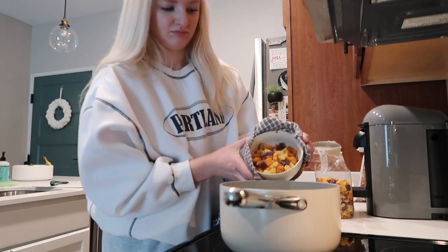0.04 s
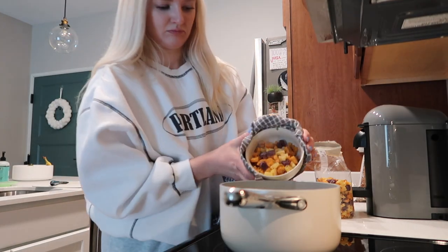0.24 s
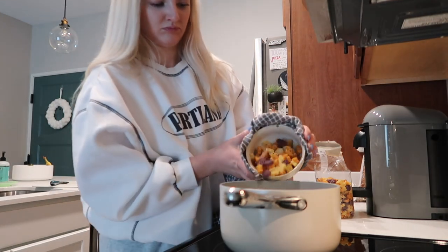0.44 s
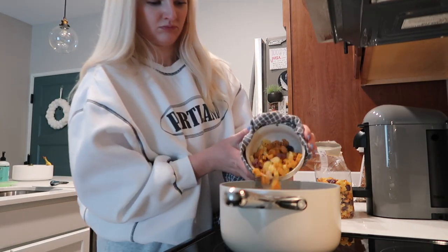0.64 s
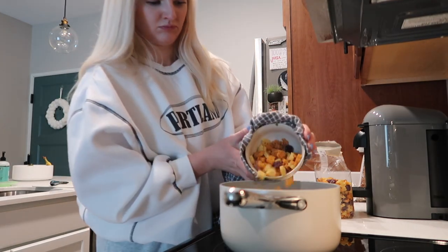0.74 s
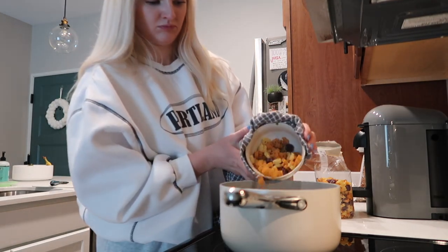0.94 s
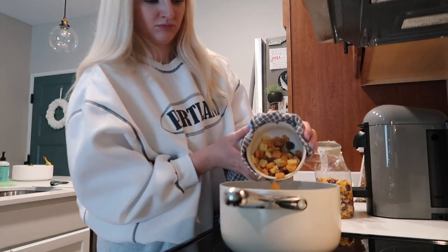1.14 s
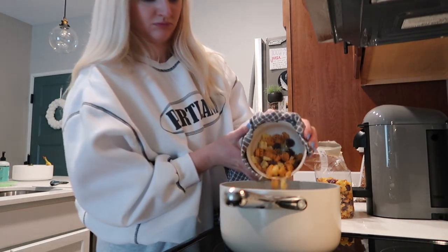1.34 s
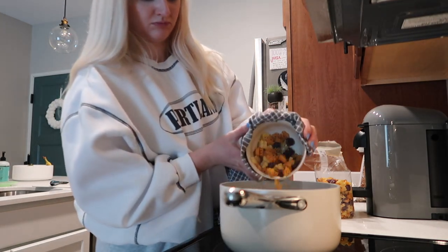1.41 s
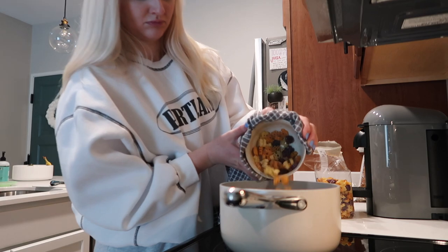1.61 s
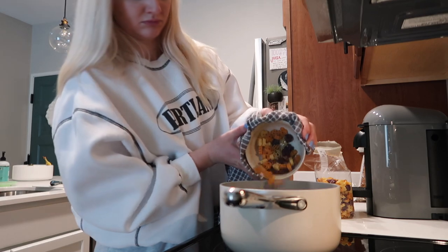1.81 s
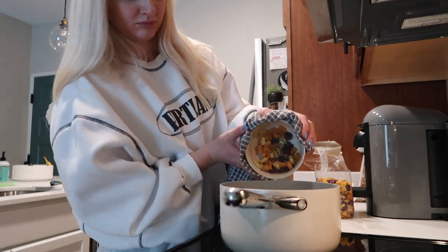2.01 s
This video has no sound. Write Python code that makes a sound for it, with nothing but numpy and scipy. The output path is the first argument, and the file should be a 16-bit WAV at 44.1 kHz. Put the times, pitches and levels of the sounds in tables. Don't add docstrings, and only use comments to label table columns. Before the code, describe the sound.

Dry pasta pours into a heavy pot, recorded close in stereo. Faint kitchen hiss and low hum open; at 0.22 s the bowl knocks the rim with a hard, short clank. From 0.4 s pieces tick brightly on ceramic and clatter hollowly onto the heap, densest around 0.7-0.9 s, thinner near 1.3 s, surging at 1.5 and 1.75 s. A dull thump lands at 1.92 s as the pour thins until about 2.05 s.

```python
import sys
import numpy as np
from scipy import signal
from scipy.fft import rfft, irfft, next_fast_len
from scipy.io import wavfile
from scipy.ndimage import uniform_filter1d

SR = 44100
rng = np.random.default_rng(int(sys.argv[2]) if len(sys.argv) > 2 else 0)


def nominal_scale(level):
    x = np.asarray(level, float) / 20
    return 10 ** x


def dump(signal):
    limited = np.clip(np.atleast_2d(signal).T, -1, 1)
    pcm = np.round(limited * 32767).astype(np.int16)
    wavfile.write(sys.argv[1], SR, pcm)


N = 90757

# f/Hz, level/dB
AIR_MID = [(90, -47), (130, -20.5), (250, -15), (1000, -26), (9300, -44.5), (11500, -46), (16000, -90)]
# f/Hz, level/dB
AIR_SIDE = [(60, -51), (130, -18), (3200, -20), (15000, -30.5)]
# f/Hz, width/Hz, level/dB
HUM = [(51, 9.3, -51.5), (123.7, 32, -53.5), (187.6, 48, -48)]
# t/s, level/dB
SWAY = [
    (0, 5),
    (.2, 0),
    (.25, 19.5),
    (.34, -1),
    (.54, 6.5),
    (.91, -4.5),
    (1.64, 3),
    (1.78, -2),
    (1.95, 9),
    (2.06, 9),
]
# f/Hz, level/dB, T60/s
POT_MODES = [(261.5, -13, 0.17), (449, -8, 0.051), (600, -10.5, 0.047), (886, -3, 0.094), (1126, -21, 0.67),
             (1795, 0, 0.038), (2373, -2.5, 0.15), (2470, -14.5, 0.16), (2681, -10.5, 0.1),
             (3330, -18, 0.14), (3920, -6, 0.021), (4365, -10.5, 0.052), (5080, -24.5, 0.098)]
# t/s, level/dB, f/Hz
THUMPS = [
    (0.221, -11.5, 227),
    (0.244, -37, 130),
    (0.275, -28, 130),
    (0.339, -28, 186),
    (0.397, -21, 210),
    (0.759, -19.5, 170),
    (1.139, -16.5, 199),
    (1.92, -10.5, 198),
    (1.942, -18, 225),
    (1.972, -24.5, 160),
]
# t/s, level/dB
WALL_TAPS = [
    (0.769, -20),
    (0.925, -26.5),
]
# f/Hz, level/dB, T60/s
BOWL_MODES = [(1700, -12, .06), (3945, 0, .036), (4075, 0, .03), (6975, 0, .034), (10700, -15, .04),
              (14900, -29, .04)]
# t/s, level/dB, twin partial level/dB, upper partials level/dB
PINGS = [(.3686, -27, -4, -25.5), (0.4319, -11, -20, -24), (0.4681, -25, -7, -10), (0.4762, -21, -23, -10),
         (0.506, -21.5, 2, -9), (0.5278, -18, -2, -18), (0.5381, -11.5, -12, -13), (0.5486, -13, -16, -12),
         (0.574, -30, -3, -5), (.594, -16.5, 6.5, -19), (0.6042, -10.5, -14, -19), (0.618, -15.5, 1, -24),
         (0.647, -19, -13.5, -23), (.6594, -17, 10, -8), (0.7217, -10, -2, -22), (.7332, -9, -8, -10),
         (0.7575, -15.5, -3, -1.5), (0.802, -20, -6, -4), (0.8225, -11, -2, -12.5), (0.898, -29.5, -8, 1),
         (0.9158, -15.5, -18, -2.5), (0.944, -44, -19, -18), (1.006, -27, -13, -23),
         (1.021, -25.5, -11, -6), (1.0852, -21, -8, -4), (1.106, -18, -5, -5.5), (1.125, -23, -3, 3),
         (1.253, -28, -13, -12), (1.4188, -22, 6, -14), (1.477, -19, -3, -14), (1.5634, -19, -15, -18),
         (1.6559, -20, -2, -7.5), (1.6704, -24, -11, -7), (1.717, -18, -2, -12), (1.7281, -21, 6, -4),
         (1.769, -24, -8, 3)]
# t/s, level/dB
SLIDE = [
    (.25, -58.5),
    (.4, -46),
    (.62, -35.5),
    (1.1, -52),
    (2.05, -64),
]
# t/s, level/dB
POUR = [
    (.3, -48),
    (.5, -38),
    (.7, -30.5),
    (.88, -32.5),
    (1.0, -36),
    (1.33, -41.5),
    (1.53, -30.5),
    (1.68, -38.5),
    (1.75, -25.5),
    (2.05, -54),
]
# t/s, level/dB, f/Hz, treble level/dB
LANDINGS = [(0.4327, -19.5, 2240, -14.5), (0.5489, -14.5, 1950, -10.5), (0.5938, -14.5, 1950, -12),
            (0.6056, -22, 2240, -24), (0.6604, -23.5, 2260, -29), (0.6811, -14.5, 3850, -12),
            (0.6888, -8.5, 3710, -16), (0.692, -21, 2680, -17), (0.707, -14, 2770, -14),
            (0.719, -20, 2950, -15), (0.7234, -14.5, 2550, -8), (0.7474, -10, 2400, -19),
            (0.7775, -5, 3660, -17), (0.8086, -13.5, 2460, -10), (0.8378, -7, 2850, -20),
            (0.8426, -6, 3610, -16.5), (0.8686, -16, 2550, -18), (0.893, -15, 2360, -25),
            (0.9224, -14, 3630, -14), (0.9271, -15.5, 2720, -34), (0.935, -28, 2700, -33),
            (0.9898, -13.5, 2000, -12), (1.0306, -16, 3560, -10), (1.0343, -12, 4330, -13.5),
            (1.038, -19, 2530, -19), (1.0424, -12, 3980, -22), (1.05, -16.5, 2750, -10.5),
            (1.1328, -11, 2440, -6.5), (1.151, -21, 3200, -6), (1.1593, -16, 3700, -14),
            (1.1636, -22.5, 4400, -16), (1.185, -11.5, 2220, -15.5),
            (1.227, -7.5, 3660, -12), (1.278, -12, 4320, -14), (1.357, -25.5, 2010, -15),
                 (1.3683, -7, 2746, -13), (1.4053, -12, 4040, -10), (1.48, -23, 3940, 3),
                 (1.4991, -5.5, 3650, -18), (1.5172, -12.5, 1950, -8), (1.55, -18, 3410, -8),
                 (1.561, -16, 3800, -25), (1.6062, -10, 2490, -12.5), (1.649, -14.5, 3900, -15),
                 (1.707, -17.5, 2350, -15), (1.714, -13.5, 2580, -12.5), (1.7315, -10.5, 4110, -15),
                 (1.7701, -15.5, 4330, -14), (1.8167, -16, 2720, -12), (1.8497, -11.5, 4500, -15.5),
                 (1.869, -10, 4570, -7), (1.8887, -11, 2340, -9.5), (1.929, -16, 3720, -18),
                 (1.958, -6, 4470, -9.5), (2.0065, -19.5, 2630, -15.5), (2.0276, -28, 2300, 14),
                 (2.0408, -13, 2240, -17.5)]
# t/s, level/dB, f/Hz
CHIPS = [(.8196, -10, 9200), (1.2277, -32, 13000), (1.4522, -22, 10200), (1.5201, -8, 9100),
         (1.5206, -15, 11700), (1.5535, -11.5, 10850), (1.777, -35, 9300), (1.7909, -11, 9000),
         (1.8488, -18, 10600), (1.8693, -25, 12740), (1.912, -14, 8500)]
# f/Hz, level/dB
LANDING_COLOUR = [(300, -13), (1000, -14.5), (1400, -8.5), (2700, -2.5), (4200, -8), (7000, -12.5),
                  (11000, -18.5), (14000, -29.5), (15900, -42)]
# f/Hz, width/Hz, level/dB
HOLLOW_MODES = [(1400, 42, -4.5), (2188, 150, -9.5), (2550, 39, -10.5), (2720, 48, -18.5), (3650, 60, -7),
                (4176, 960, -6.5)]
# f/Hz, T60/s
ROOM_T60 = [(500, 0.82), (10000, 0.067)]
# f/Hz, level/dB
ROOM_APART = [(700, -26), (2200, -26), (3800, -3)]
# f/Hz, lead of the left port/rad
PORT_LEAD = [(3800, -1.5), (4900, -1.02), (5900, -1.4), (9000, -2.5), (12500, -2.5), (15600, -2)]

AIR_MID_DB, AIR_SIDE_DB, AIR_PATCH_DB = -49, -57.5, 5
KNOCK_S, KNOCK_DB = .2222, -7
CRACK_DB, CRACK_S, CRACK_HZ = -8.5, 0.018, 1890
THUMP_T60_S, THUMP_RISE_S, THUMP_UPPER_HZ, THUMP_UPPER_DB = .045, .004, 722, -11
PING_RISE_S, PING_DB, PING_LUCK_DB = .002, 4, -1
PING_WAVER = .004
SLIDES_PER_S, SLIDE_SPREAD_DB, SLIDE_DB = 460, 5.5, 7
TICKS_PER_S, TICK_SPREAD_DB, TICK_DB, TICK_TREBLE_DB = 900, 2.5, 0, 2
HOLLOW_DB = -3
SNAP_S, BOUNCE_S, BOUNCE_DB = .0007, 0.003, -18
RATTLE_S, RATTLE_DB = 0.0067, -4.5
PITCH_WIDTH_HZ, PITCH_DB = 404, -5.5
LANDING_TREBLE_DB, LANDING_DB = 17, 2.5
CHIP_T60_S = .006
ROOM_DB = -14.5
PORTS_ALIKE_HZ, PORTS_PART_HZ, PORTS_PART_RAD, PORT_TILT_DB = 2000, 3100, -.55, -1
LOW_CUT_HZ = 74
MID_MUTE_DB, MID_MUTE_HZ, MID_MASK_DB = -85.5, 8880, -17.5
SIDE_MUTE_DB, SIDE_MUTE_HZ = -79, 14100


def evened(x):
    return x / np.sqrt(np.mean(x ** 2) + 1e-20)


def read(points, hz):
    f, value = np.transpose(points)
    return np.interp(np.log(hz + 1), np.log(f + 1), value)


def curve(points):
    s, db = np.transpose(points)
    return nominal_scale(np.interp(np.arange(N) / SR, s, db, left=-120))


def add(mix, s, sound):
    part = mix[max(round(s * SR), 0):][:len(sound)]
    part += sound[:len(part)]


def shape(x, gain):
    size = next_fast_len(x.shape[-1] + 2048)
    spectrum = rfft(x, size) * gain(np.fft.rfftfreq(size, 1 / SR))
    return irfft(spectrum, size)[..., :x.shape[-1]]


def brighter(x, db):
    return shape(x, lambda hz: nominal_scale(read([(4200, 0.0054), (6000, db)], hz)))


def resonate(x, hz, width_hz):
    r = np.exp(-np.pi * width_hz / SR)
    poles = [2, -4 * r * np.cos(2 * np.pi * hz / SR), 2 * r * r]
    return signal.lfilter([1 - r * r, 0, r * r - 1], poles, x)


def ring(modes, length, rise):
    t = np.arange(0, length, 1 / SR)
    hz, db, t60 = np.transpose(modes)[:, :, None]
    return nominal_scale(db - 60 * t / t60) * np.sin(2 * np.pi * hz * t) * (1 - np.exp(-t / rise))


def scatter(per_s, spread_db):
    chance, sign, size = rng.random((N, 3)).T
    level_db = np.minimum(-spread_db * np.log(size + 1e-9), 15)
    return (chance < per_s / SR) * np.sign(sign - .5) * nominal_scale(level_db)


def air():
    frames, hz = N // 256 + 5, np.fft.rfftfreq(1024, 1 / SR)
    a, b, c, d, patches = rng.standard_normal((frames, 513, 5)).T
    patches = uniform_filter1d(uniform_filter1d(patches, 8, 0), 10, 1)
    patches = nominal_scale(AIR_PATCH_DB * evened(patches))
    mid_bins = (a + 1j * b) * nominal_scale(read(AIR_MID, hz))[:, None]
    side_bins = (c + 1j * d) * nominal_scale(read(AIR_SIDE, hz))[:, None]
    z = np.array([mid_bins, side_bins]) * patches
    mid, side = signal.istft(z, nperseg=1024, noverlap=768)[1][:, :N]
    mid, side = nominal_scale(AIR_MID_DB) * evened(mid), nominal_scale(AIR_SIDE_DB) * evened(side)
    return np.array([mid + side, mid - side])


def hum():
    drones = []
    for noise, (hz, width_hz, db) in zip(rng.standard_normal((len(HUM), N)), HUM):
        drone = resonate(resonate(noise, hz, width_hz), hz, width_hz)
        drones.append(nominal_scale(db) * evened(drone))
    low, middle, high = drones
    return (low + middle) * curve(SWAY) + high


def rim_knock(out):
    t = np.arange(3000) / SR
    modes = [(hz, db, min(t60, .3)) for hz, db, t60 in POT_MODES]
    knock = ring(modes, .6, 0.0012).sum(0)
    crack = rng.standard_normal(3000) * np.exp(-t / CRACK_S)
    crack = shape(crack, lambda hz: 1 / (1 + (hz / CRACK_HZ) ** 4))
    add(out, KNOCK_S, nominal_scale(KNOCK_DB) * knock / abs(knock).max())
    add(out, KNOCK_S, nominal_scale(KNOCK_DB + CRACK_DB) * crack / abs(crack).max())


def pot():
    out, t = np.zeros(N), np.arange(3000) / SR
    rim_knock(out)
    for (s, db, hz), noise in zip(THUMPS, rng.standard_normal((len(THUMPS), 3000))):
        modes = [(hz, db, THUMP_T60_S), (hz * 1.223, db - 11.0, THUMP_T60_S)]
        add(out, s, ring(modes, .2, THUMP_RISE_S).sum(0))
        puff = evened(resonate(noise, 510, 500)) * np.exp(-t / 0.0094) * (1 - np.exp(-t / THUMP_RISE_S))
        add(out, s, nominal_scale(db + THUMP_UPPER_DB) * puff)
    for s, db in WALL_TAPS:
        add(out, s, ring([(THUMP_UPPER_HZ, db, .04)], .1, 0.00085)[0])
    return out


def bowl_patter():
    taps = scatter(SLIDES_PER_S, SLIDE_SPREAD_DB)
    rows = []
    for partial in ring(BOWL_MODES, .12, PING_RISE_S):
        strikes = taps * rng.uniform(-0.35, 1, N)
        rows.append(signal.oaconvolve(strikes, partial)[:N])
    patter = np.array(rows)
    patter[2:] *= nominal_scale(-14)
    return nominal_scale(SLIDE_DB) * curve(SLIDE) * evened(patter) / np.sqrt(len(BOWL_MODES))


def bowl():
    out = np.zeros((len(BOWL_MODES), N))
    hz, rest_db, t60 = np.transpose(BOWL_MODES)
    chances = rng.standard_normal((len(PINGS), 2, len(BOWL_MODES)))
    for (s, db, twin_db, upper_db), (luck, waver) in zip(PINGS, chances):
        luck_db = PING_LUCK_DB * luck * [1, 0, 0, 0, 1, 1]
        mode_db = rest_db + db + PING_DB + luck_db + upper_db * (hz > 5000)
        mode_db[2] += twin_db
        modes = np.transpose([hz * (1 + PING_WAVER * waver), mode_db, t60])
        for row, partial in zip(out, ring(modes, .12, PING_RISE_S)):
            add(row, s, partial)
    return out + bowl_patter()


def hollow(x):
    cavities = sum(nominal_scale(db) * resonate(x, hz, width_hz) for hz, width_hz, db in HOLLOW_MODES)
    x = x + nominal_scale(HOLLOW_DB) * 4 * cavities
    return shape(x, lambda hz: nominal_scale(read(LANDING_COLOUR, hz)))


def small_ticks():
    taps = scatter(TICKS_PER_S, TICK_SPREAD_DB)
    kind = rng.integers(0, 16, N)
    grains = rng.standard_normal((16, 400)) * np.exp(-np.arange(400) / SR / 0.0015)
    ticks = sum(signal.oaconvolve(taps * (kind == k), g)[:N] for k, g in enumerate(grains))
    return nominal_scale(TICK_DB) * curve(POUR) * evened(brighter(hollow(ticks), TICK_TREBLE_DB))


def snap(t):
    return np.exp(-abs(t) / SNAP_S) * (t > 0)


def clack(hz, treble_db, noise):
    t = np.arange(len(noise)) / SR
    grain = 0.45 + abs(uniform_filter1d(noise[::-1], size=40)) * 6
    rattle = nominal_scale(RATTLE_DB) * grain * np.exp(-t / RATTLE_S)
    envelope = snap(t) + nominal_scale(BOUNCE_DB) * snap(t - BOUNCE_S) + rattle
    burst = (noise + 2.0 * signal.unit_impulse(len(t), idx=12)) * envelope
    burst = burst * (1 - np.exp(-t / 0.00038))
    burst = burst + nominal_scale(PITCH_DB) * 4 * resonate(burst, hz, PITCH_WIDTH_HZ)
    sound = brighter(hollow(burst), treble_db + LANDING_TREBLE_DB)
    return sound / abs(sound).max()


def pasta():
    out, landings = small_ticks(), LANDINGS
    for (s, db, hz, treble_db), noise in zip(landings, rng.standard_normal((len(landings), 2600))):
        add(out, s, nominal_scale(db + LANDING_DB) * clack(hz, treble_db, noise))
    for s, db, hz in CHIPS:
        modes = [(hz, db, CHIP_T60_S), (hz * 1.08, db - 3, CHIP_T60_S)]
        add(out, s, ring(modes, .03, 0.00022).sum(0))
    return out


def kitchen(x):
    size = SR // 2
    taps, slots = np.zeros((2, size)), np.arange(200, size - 20, 20)
    at = slots + rng.integers(0, 20, (2, len(slots)))
    np.put_along_axis(taps, at, rng.choice([-1., 1.], at.shape), 1)
    hz, t, z = signal.stft(taps, SR, nperseg=256)
    decay = nominal_scale(-60 * t / read(ROOM_T60, hz)[:, None])
    tail = signal.istft(z * decay, SR, nperseg=256)[1]
    mid, side = signal.fftconvolve(x[None], tail / np.linalg.norm(tail[0]), axes=1)[:, :N]
    side = shape(side, lambda f: nominal_scale(read(ROOM_APART, f)))
    return nominal_scale(ROOM_DB) * np.array([mid + side, mid - side])


def ports(x):
    lead = [(PORTS_ALIKE_HZ, 0), (PORTS_PART_HZ, PORTS_PART_RAD)] + PORT_LEAD
    tilt = [(PORTS_ALIKE_HZ, 0), (PORTS_PART_HZ, PORT_TILT_DB)]

    def half(hz):
        return nominal_scale(read(tilt, hz) / 2) * np.exp(.5j * read(lead, hz))

    return np.array([shape(x[0], half), shape(x[1], lambda hz: 1 / half(hz))])


def muted(x, db, from_hz, mask=0):
    hz, _, z = signal.stft(x, SR, nperseg=1024)
    band = np.repeat(abs(z[:512]).reshape(32, 16, -1).mean(1), 16, axis=0)
    faint = band < nominal_scale(db) + mask * band.mean(0)
    z[:512] *= 1 - faint * (hz[:512, None] > from_hz)
    return signal.istft(z, SR, nperseg=1024)[1][:N]


def scene():
    ringing = bowl()
    near = pot() + ringing[:-2].sum(0) + pasta()
    return ports(near + kitchen(near)) + air() + hum() + ringing[-2:].sum(0)


def top_cut(x):
    return signal.sosfilt(signal.butter(12, 16060, fs=SR, output="sos"), x)


def record(dry):
    dry = shape(dry, lambda hz: 1 / (1 + (LOW_CUT_HZ / (hz + 1)) ** 4))
    mid = muted((dry[0] + dry[1]) / 2, MID_MUTE_DB, MID_MUTE_HZ, nominal_scale(MID_MASK_DB))
    side = muted((dry[0] - dry[1]) / 2, SIDE_MUTE_DB, SIDE_MUTE_HZ)
    return top_cut(np.array([mid + side, mid - side]))


dry = scene()
out = record(dry)
dump(out)
```